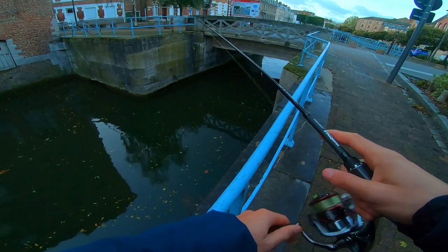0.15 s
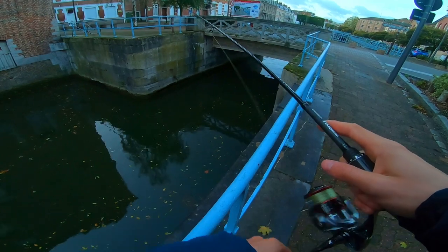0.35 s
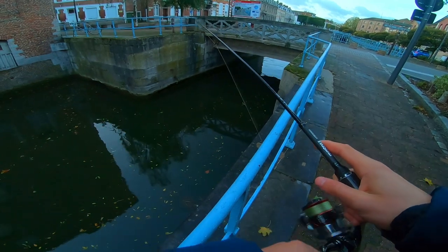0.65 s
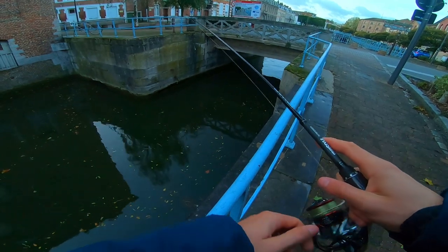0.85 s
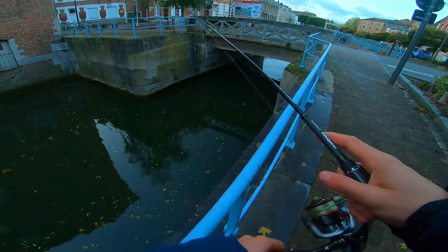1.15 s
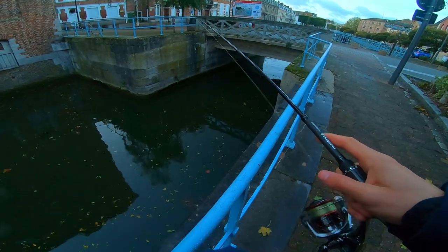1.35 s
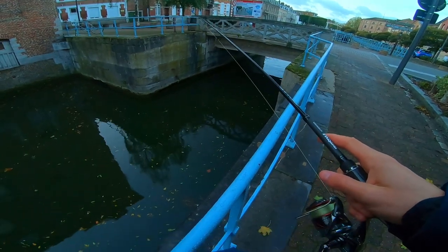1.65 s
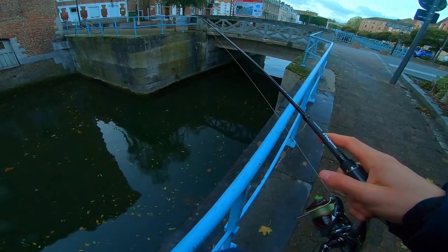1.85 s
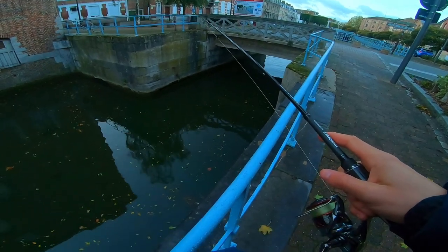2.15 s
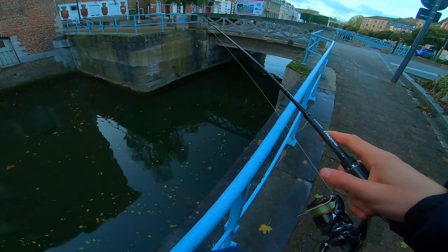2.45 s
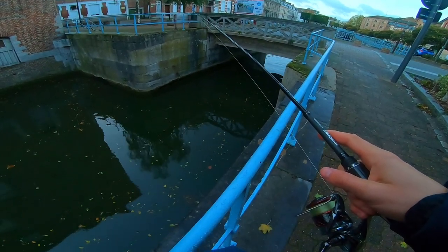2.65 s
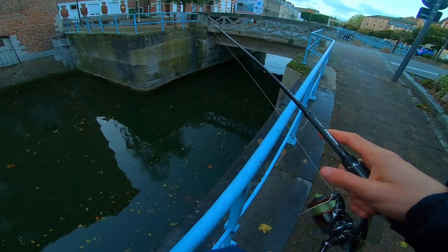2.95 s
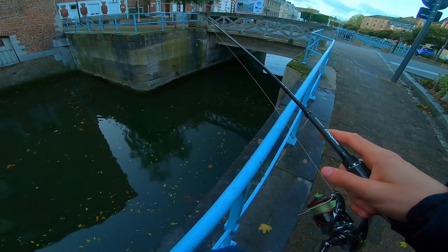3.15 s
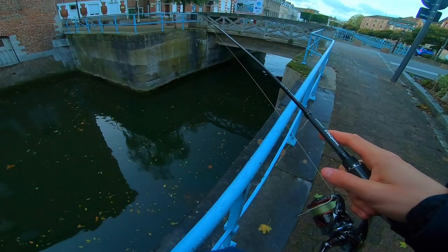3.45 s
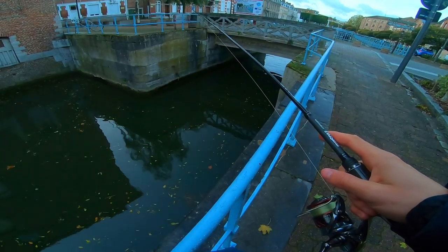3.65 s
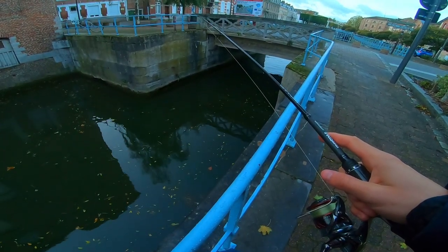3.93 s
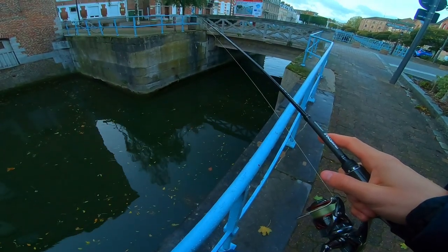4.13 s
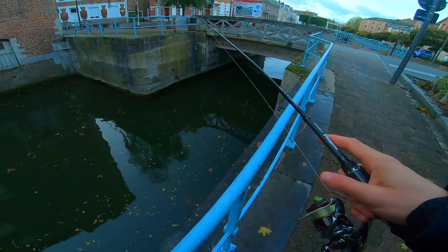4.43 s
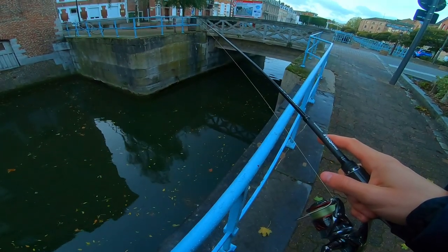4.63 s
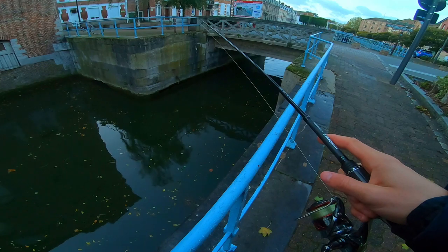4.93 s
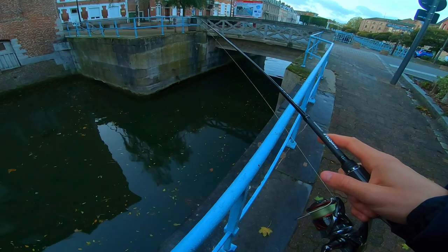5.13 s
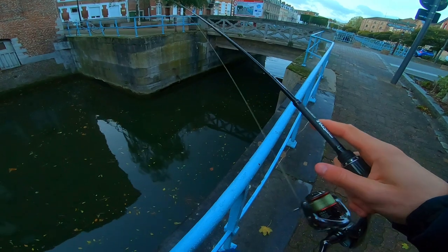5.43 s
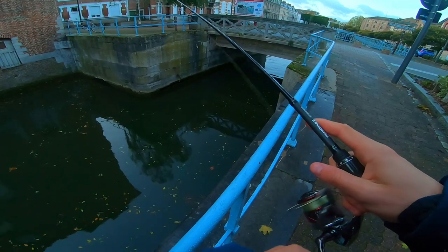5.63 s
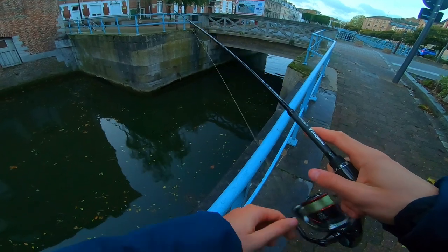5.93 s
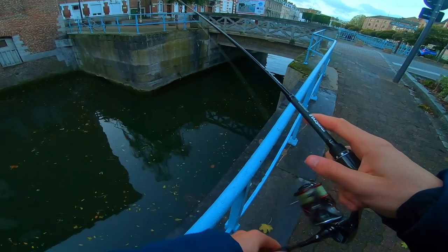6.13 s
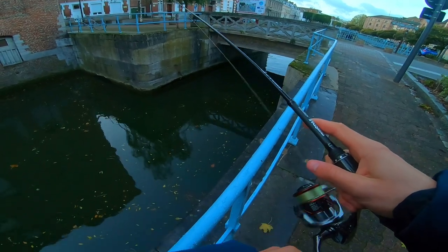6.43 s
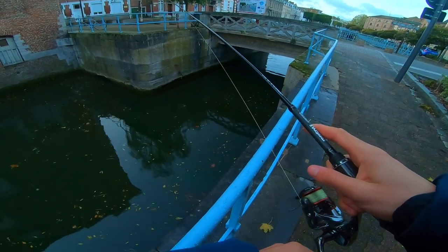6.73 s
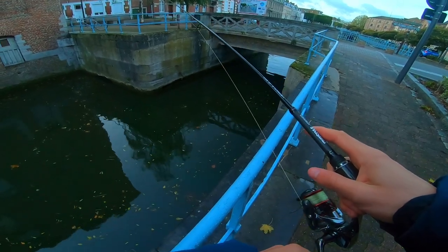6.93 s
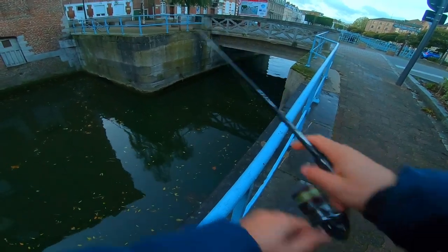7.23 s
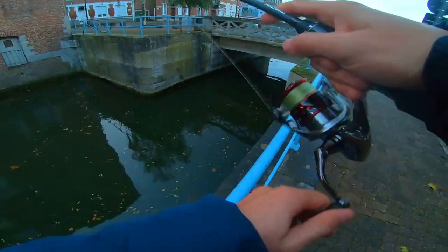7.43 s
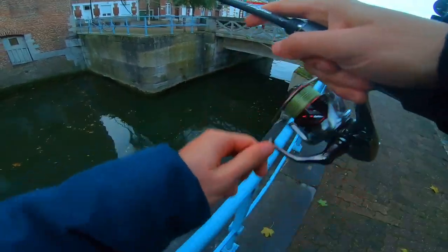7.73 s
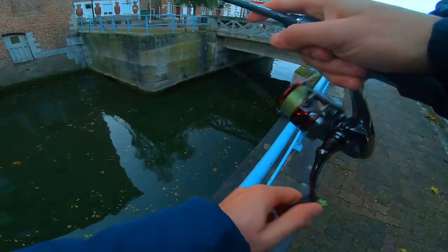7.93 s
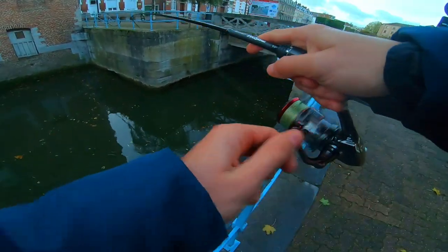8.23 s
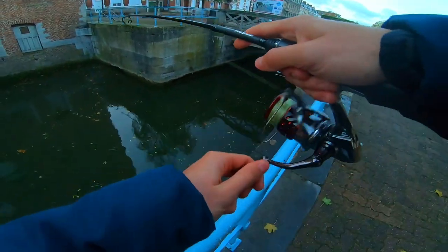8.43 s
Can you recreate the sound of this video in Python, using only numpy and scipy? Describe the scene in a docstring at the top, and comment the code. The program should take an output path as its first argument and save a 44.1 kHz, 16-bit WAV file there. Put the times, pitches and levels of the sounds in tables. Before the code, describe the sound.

Faint reel whir and cloth rustle over low traffic rumble and buffeting wind, then a sharp ratchet rip, clack and grinding, loaded winding.

```python
"""A fishing reel is wound with a faint whir beside a city canal; at the strike the drag ratchet rips.
Brief contacts ring the spool, and meshing gears under load drive the resonances of the reel body.
Knocks are short decaying partials, the sleeve is clumped friction grains, the squeaks are gliding noise.
Gusts thump as low-frequency noise and single pulses on two microphone ports; filtered noise is far traffic."""
import sys
import numpy as np
from scipy import signal
from scipy.fft import rfft, irfft
from scipy.io import wavfile
from scipy.ndimage import uniform_filter1d

SR = 44100
rng = np.random.default_rng(int(sys.argv[2]) if len(sys.argv) > 2 else 0)


def waveform_to_disk(signal):
    """Save audio, clipped to [-1, 1], as 16-bit WAV at the path in sys.argv[1]."""
    frames = np.transpose(np.atleast_2d(signal))
    scaled = np.clip(frames, -1, 1) * 32767
    samples = np.round(scaled).astype(np.int16)
    wavfile.write(sys.argv[1], SR, samples)


N = 378378
HZ = np.maximum(np.arange(N // 2 + 1) * SR / N, 1)   # frequency of each spectral bin


def from_db(db):
    """Decibel law: 20 dB is a tenfold amplitude."""
    return 10 ** (np.asarray(db) / 20)


def rms_one(x):
    """Normalization: the signal is scaled to an rms of 1."""
    return x / np.sqrt(np.mean(x ** 2) + 1e-20)


def in_time(rows, silent=False):
    """Linear interpolation of an envelope table; a silent one sinks to -120 outside its span."""
    s, *columns = np.transpose(rows)
    edge = -120 if silent else None
    t = np.arange(N) / SR
    return [np.interp(t, s, column, edge, edge) for column in columns]


def at_hz(points, hz):
    """Interpolation of a spectrum on a logarithmic frequency axis."""
    table_hz, values = np.array(points).T
    return np.interp(np.log(hz), np.log(table_hz), values)


def drift(rate):
    """Low-pass random process: noise through a double pole near rate (Hz) wanders with rms 1."""
    step = 40   # samples between the drawn values
    pole = np.exp(-2 * np.pi * rate * step / SR)
    noise = rng.standard_normal(N // step + 2002)
    slow = signal.lfilter([1], [1, -2 * pole, pole * pole], noise)[2000:]   # settled part
    return np.interp(np.arange(N) / step, np.arange(len(slow)), rms_one(slow))


def hold(start, end, edge_s):
    """Amplitude envelope: a squared ramp up, a plateau and a squared ramp down to the end."""
    t = np.arange(N) / SR
    return np.clip(np.minimum(t - start, end - t) / edge_s, 0, 1) ** 2


def resonance(x, hz, width):
    """Second-order resonance: a pole pair passes a band with a gain near 1 at its peak."""
    r = np.exp(-np.pi * width / SR)
    poles = [1, -2 * r * np.cos(2 * np.pi * hz / SR), r * r]
    return signal.lfilter([(1 - r * r) / 2, 0, (r * r - 1) / 2], poles, x)


def narrow(x, hz, width):
    """Cascaded resonance: a second pass steepens the skirts; rms 1."""
    return rms_one(resonance(resonance(x, hz, width), hz, width))


def ring(clicks, hz, t60):
    """Damped free vibration: each unit click starts a sine that falls 60 dB in t60 seconds."""
    r, w = from_db(-60 / (t60 * SR)), 2 * np.pi * hz / SR
    return signal.lfilter([0, np.sin(w)], [1, -2 * r * np.cos(w), r * r], clicks + 1e-18)


def gliding(hz, pole):
    """Quadrature modulation: low-pass noise is shifted up to a moving centre; rms 1."""
    turn = 2 * np.pi * np.cumsum(hz) / SR
    slow = signal.lfilter([1], [1, -2 * pole, pole * pole], rng.standard_normal((2, 2, N)))
    return rms_one(slow[0] * np.cos(turn) + slow[1] * np.sin(turn))


def evened(x, size):
    """Dynamic compression: division by the local rms partly flattens chance swells; rms 1."""
    x = rms_one(x)
    return rms_one(x / np.sqrt(uniform_filter1d(x ** 2, size) + .3))


def coloured(x, spectrum):
    """Spectral shaping: the noise takes the slope of a spectrum table; rms 1."""
    return rms_one(irfft(rfft(x) * from_db(at_hz(spectrum, HZ)), N))


def grains(per_s, spread_db):
    """Shot noise: a pair of random click trains of uneven size and sign; rms 1."""
    sizes_db = spread_db * np.minimum(rng.exponential(1, (2, N)), 4)
    sizes = from_db(sizes_db) * rng.choice([-1, 1], (2, N))
    return rms_one(sizes * (rng.random((2, N)) < per_s / SR))


def ratchet(contact_s=0.00015):
    """Impulsive excitation: each click is a brief rough contact that strikes all spool modes."""
    # Clicks that ring the spool: the ratchet teeth, then one late bail click.
    # Each row: start in seconds, relative peak in dB, upper modes over lower in dB.
    strikes = [(7.271, -35, 8), (7.2767, -37, -1), (7.371, -33, -3), (7.3773, -34, -4), (7.3818, -30, -2),
               (7.3846, -25, 5), (7.387, -21, 6), (7.391, -22, 4), (7.3928, -20, -8), (7.396, -22, -4),
               (7.3992, -26, -5), (7.403, -26, -1), (7.4055, -29, 3), (7.4085, -23, 11), (7.4127, -32, 6),
               (7.4163, -31, 4), (7.4196, -25, 6), (7.4237, -22, 7), (7.429, -26, -1), (7.435, -22.5, -8),
               (7.4439, -26, -2), (7.4509, -17.5, -7), (7.809, -29, -2)]
    # Modes of the spool. Each row: frequency in Hz, relative level in dB, t60 in seconds.
    spool_modes = [(1900, -21, 0.0067), (3220, -10, 0.0037), (4380, -13, 0.004), (5260, -3, 0.007),
                   (5800, 3, 0.008), (6370, 0, 0.005), (8250, 1, 0.005), (9050, -4, 0.005),
                   (9900, -5, 0.004), (11500, -13, 0.002), (13000, -14, .0015), (14800, -18, .0015)]
    s, peak_db, upper_db = np.transpose(strikes)
    steps, out = np.arange(60), np.zeros((2, N))
    at = np.round(s * SR).astype(int)[:, None] + steps
    fade = np.exp(-steps / (contact_s * SR))
    for hz, level_db, t60 in spool_modes:
        contact = rng.standard_normal((len(s), 2, len(steps))) * fade
        # how hard each contact drives this mode
        drive = np.abs(contact @ np.exp(2j * np.pi * hz * steps / SR))
        share_db = np.minimum(upper_db, 0) if hz > 7200 else np.minimum(-upper_db, 0)
        height = from_db(peak_db + level_db + share_db)[:, None] / (drive + 0.18)
        clicks = np.zeros((2, N))
        clicks[:, at] = (contact * height[..., None]).swapaxes(0, 1)
        out += resonance(ring(clicks, hz, t60), hz, hz / 3)
    return out * from_db([[1], [-5]])   # a near source: both ports hear much the same


def gears(damping_hz=9500, catch_db=2.5):
    """Forced vibration: teeth mesh unevenly, catch in clumps and drive the modes of the reel body."""
    # Effort on the handle under load. Each row: time in seconds, then the drive in dB of the modes
    # up to 2500 Hz, of those up to 5000 Hz and of those above.
    effort = [(7.52, -76, -72, -74), (7.6, -69, -59, -64), (7.655, -58, -55, -56), (7.73, -63, -54, -54.5),
              (7.79, -49, -56, -53.5), (7.83, -59, -61, -63), (7.87, -55, -62, -63), (7.925, -55, -54, -56),
              (7.99, -61, -62, -64), (8.055, -55, -56, -59), (8.09, -56, -61, -63), (8.15, -59, -52.5, -58),
              (8.22, -62, -59, -58.5), (8.3, -65, -64, -59.5), (8.4, -61, -62, -59), (8.45, -54, -62, -62),
              (8.5, -52, -71, -64), (8.54, -72, -78, -71), (8.58, -81, -81, -71)]
    # Modes of the body. Each row: frequency in Hz, width of one filter pass in Hz, relative level in dB.
    body_modes = [(2050, 130, -5), (3320, 60, -8), (3620, 90, -3), (4295, 140, -8), (4720, 60, -11),
                  (5290, 300, -4), (5780, 350, -4), (6150, 400, -2), (4000, 900, -7), (2900, 2000, -6),
                  (7200, 1400, -4), (9300, 2500, -9), (12300, 3000, -22)]
    hum_db, whine_db, whirr_db = in_time(effort, silent=True)
    mesh = from_db(catch_db * drift(40)) * grains(3000, 2.9)
    mesh = irfft(rfft(mesh) / (1 + (HZ / damping_hz) ** 4 + (1200 / HZ) ** 2), N)
    loaded, out = slice(round(effort[0][0] * SR), N), 0
    for k, (hz, width, level_db) in enumerate(body_modes):
        effort_db = whirr_db if hz > 5000 else whine_db if hz > 2500 else hum_db
        mode = (-1) ** k * evened(narrow(mesh[:, loaded], hz, width), size=700)
        out = out + from_db((effort_db + level_db + 1.0 * drift(14))[loaded]) * mode
    return np.pad(out, ((0, 0), (loaded.start, 0)))


def winding(upper_hz=8400, upper_db=-9):
    """Speed-dependent pitch: the rotor whirs in a climbing band; the line roller squeaks below it."""
    # Pushes on the handle. Each row: start, fastest moment and end in seconds, relative whir level in dB,
    # nominal whir pitch in Hz when fastest.
    pushes = [(.115, .195, .48, -60, 7700), (.52, .55, .6, -67, 7100), (.77, .87, 1.06, -64, 7500),
              (1.08, 1.17, 1.31, -69, 7250), (5.54, 5.565, 5.66, -66, 8100), (5.93, 6.14, 6.3, -60, 7750)]
    # Squeaks of the line roller. Each row: start and length in seconds, relative level in dB, pitch in Hz.
    squeaks = [(0, .12, -66, 4500), (.22, .2, -67, 4350), (.72, .06, -67, 4300), (1.15, .1, -64, 4580),
               (1.27, .06, -62.5, 4480), (1.35, .09, -62.5, 4500), (1.46, .07, -67, 4400),
               (5.76, .18, -64.5, 4500), (5.99, .11, -64.5, 4380), (6.4, .1, -70, 4500)]
    # The rotor sings a thin line as it turns. Each row: start and end in seconds, relative level in dB.
    turns = [(.12, 1.33, -71), (5.57, 6.3, -70)]
    rest_hz, surge_s, sag_db_per_s, edge_s = 7050, .04, 10, .045   # pitch and level peak when fastest
    t = np.arange(N) / SR
    whir, whir_hz, roller, roller_hz = 0, rest_hz, 0, 0
    for start, fastest, end, db, top_hz in pushes:
        surge = np.exp(-((t - fastest) / surge_s) ** 2)
        sagging_db = db - sag_db_per_s * np.abs(t - fastest)
        whir = whir + from_db(sagging_db) * hold(start, end, edge_s)
        climb = .7 * surge + .5 * hold(start, end, (end - start) / 3) ** .5
        whir_hz = whir_hz + (top_hz - rest_hz) * climb
    for start, length, db, hz in squeaks:
        early = start - edge_s / 2
        roller = roller + from_db(db) * hold(early, start + length, edge_s / 2)
        roller_hz = np.where(t > early, hz, roller_hz)
    out = whir * from_db(2.2 * drift(25)) * gliding(whir_hz + 90 * drift(25), pole=.95)
    line = sum(from_db(db) * hold(start, end, edge_s) for start, end, db in turns)
    out += line * from_db(2.5 * drift(12)) * narrow(rng.standard_normal((2, N)), rest_hz, 380)
    squeak = evened(gliding(roller_hz + 50 * drift(15), pole=.978), size=900)
    out += roller * from_db(1.5 * drift(25)) * squeak
    upper_band = narrow(rng.standard_normal((2, N)), upper_hz, 500)   # its pitch stays put
    return out + whir * from_db(upper_db + 3 * drift(13)) * upper_band


def knocks(crack_db=-16):
    """Modal impact: a struck part rings in a few decaying partials, over a dying crack of noise."""
    # Knocks of handle and bail, and the low crack of the last ratchet click.
    # Each row: start in seconds, relative peak in dB, pitch in Hz, t60 in seconds, left over right in dB.
    blows = [(7.283, -37, 2260, 0.01, -2), (7.4509, -19.5, 1920, 0.0064, -10),
             (7.4885, -23.5, 1560, 0.019, -8), (7.663, -39, 4070, .015, -5),
             (7.778, -24.5, 2900, 0.0037, -4), (8.158, -44, 3600, .025, -1.5), (7.929, -39, 1900, .01, -2),
             (8.069, -41, 4350, .012, -1), (8.4544, -45, 2040, 0.029, -10), (8.481, -42, 4370, .02, -1)]
    # Partials of a struck part. Each row: multiple of its pitch, relative level in dB.
    partials = [(.58, -4), (1, 0), (1.39, -9)]
    out, seconds = np.zeros((2, N)), np.arange(1500) / SR
    for s, peak_db, hz, t60, pan_db in blows:
        crack_fade = from_db(crack_db - 60 * seconds / (1.8 * t60))
        crack = narrow(rng.standard_normal(len(seconds)), hz, hz) * crack_fade
        modes = sum(from_db(db) * np.sin(2 * np.pi * multiple * hz * seconds) for multiple, db in partials)
        onset = 1 - np.exp(-seconds * hz)
        blow = modes * from_db(-60 * seconds / t60) * onset + crack
        at = round(s * SR)
        out[:, at:at + len(blow)] += from_db(peak_db + pan_db / 2 * np.array([[1], [-1]])) * blow
    return out


def chirp():
    """Frequency glide: one faint breathy note of band noise slides down."""
    # One row: start and length in seconds, level in dB, first and last pitch in Hz.
    start, length, db, from_hz, to_hz = (5.275, .05, -62, 7300, 5700)
    hz = np.interp(np.arange(N) / SR, [start, start + length], [from_hz, to_hz])
    return from_db(db) * hold(start, start + length, length / 3) * gliding(hz, pole=.96)


def sleeve(split_hz=5000):
    """Friction noise: sliding cloth is dense fine grains in clumps, with the treble set apart."""
    # Sleeve and line in motion, a list for each spell.
    # Each row: time in seconds, level in dB, treble gain over the usual colour in dB.
    spells = [
        [(0, -55, -7), (.3, -53, -11), (.55, -56, -9), (1.05, -65, -12), (1.2, -52.5, -13), (1.5, -81, -11)],
        [(5.5, -67, 2), (5.7, -52.5, -8), (5.95, -65, -4), (6.3, -68, 3), (6.6, -61, -7)],
        [(7.19, -70, 0), (7.25, -55, 2), (7.28, -41.5, -11), (7.325, -46.5, 3), (7.36, -39.5, 0),
         (7.395, -38.5, 5.5), (7.44, -41.5, 6), (7.465, -35.5, -2), (7.488, -37, -5), (7.5, -47.5, -1),
         (7.555, -49, -4), (7.6, -74, -1)],
    ]
    # Colour of the cloth. Each row: frequency in Hz, relative level in dB per Hz.
    spectrum = [(300, -17), (700, 0.5), (1200, -0.5), (2300, -5), (4500, -5.5), (6300, -9.5), (8300, -7.5),
                (10000, -17), (12000, -26.5), (15500, -35)]
    cloth = from_db(2.6 * drift(60)) * coloured(grains(14000, 3.0), spectrum)
    treble = irfft(rfft(cloth) / (1 + (split_hz / HZ) ** 4), N)
    out = 0
    for rows in spells:
        level_db, treble_db = in_time(rows, silent=True)
        out = out + from_db(level_db) * (cloth - treble + from_db(treble_db) * treble)
    return out


def wind(buffet_db=1.5, bright_db=-13, knee_db=-25, leak_db=-19):
    """Turbulent pressure: eddies press on each port, and stronger gusts reach higher in pitch."""
    # Course of the wind, with its longer gusts and lulls.
    # Each row: time in seconds, level in dB at the exposed left and the sheltered right port.
    course = [(0, -41, -46), (1.5, -35, -44), (1.9, -48, -48), (3.8, -46, -46), (5.2, -55, -58),
              (6.3, -47, -46), (6.5, -23.5, -42), (6.95, -23, -49), (7.03, -35, -46), (7.1, -25.5, -46),
              (7.27, -29.5, -43), (7.35, -29.5, -32.5), (8.16, -24.5, -33), (8.23, -33, -40),
              (8.58, -53, -47)]
    # Short gusts on the left port. Each row: middle and length in seconds, level in dB.
    gusts = [(0.1, 0.14, -34), (0.31, 0.22, -29), (0.8, 0.11, -27.5), (1.342, 0.27, -33),
             (1.517, 0.11, -37), (1.72, 0.14, -26.5), (1.986, 0.11, -30), (2.568, 0.35, -29),
             (2.8, 0.26, -26), (3.164, 0.071, -30), (3.463, 0.23, -26.5), (3.592, 0.085, -26),
             (4.09, 0.16, -40), (5.037, .12, -47), (5.49, 0.14, -34.5), (5.882, 0.15, -30),
             (6.2, 0.34, -27), (7.544, 0.34, -17.5), (7.93, .14, -31), (8.142, 0.27, -20.5),
             (8.36, .2, -29)]
    # Colour of the wind. Each row: frequency in Hz, relative level in dB per Hz.
    spectrum = [(9, -30), (16, -2), (26, 0), (40, 1), (65, -3), (95, -14), (140, -20), (200, -27),
                (300, -40), (600, -90)]
    # Single eddies bursting. Each row: middle in seconds, relative peak in dB, pitch in Hz,
    # port (0 left, 1 right).
    thumps = [(0.266, -23, 79.6, 0), (0.366, -17, 35, 0), (3.441, -22, 108, 0), (6.802, -23, 84, 0),
              (6.891, -13.5, 94, 0), (1.709, -25, 46.6, 0), (2.012, -15.5, 35.4, 0),
              (2.748, -15.5, 43.7, 0), (4.063, -21.5, 44.7, 0), (6.488, -11.5, 77, 0), (6.7, -11.5, 44, 0),
              (6.966, -19, 64.5, 0), (7.22, -21, 60.4, 0), (7.344, -15, 77, 0), (7.547, -12.5, 75, 0),
              (7.734, -14.5, 70, 0), (7.936, -13, 42.5, 0), (8.002, -12, 54.5, 1), (8.138, -16, 47, 1),
              (8.16, -9, 85, 0), (8.334, -13, 40.6, 0)]
    gust_db = np.array(in_time(course))
    swells = 0
    for s, length, db in gusts:
        swells = swells + from_db(db) * hold(s - length / 2, s + length / 2, length / 2) ** .5
    gust_db[0] = 10 * np.log10(from_db(gust_db[0]) ** 2 + swells ** 2)   # powers add
    low = coloured(rng.standard_normal((2, N)), spectrum)
    # the gust sets the level, not the eddies
    low = low / np.sqrt(uniform_filter1d(low ** 2, size=3500) + 0.019)
    flutter = narrow(narrow(rng.standard_normal((2, N)), 145, 220), 145, 220)
    lift = from_db(bright_db + .7 * (gust_db - knee_db).clip(-25, 6) + 2.5 * drift(14))
    buffet = buffet_db * np.array([drift(4.8), drift(12.0)])
    out = from_db(gust_db + buffet) * (low + lift * flutter)
    seconds = np.arange(-2000, 2000) / SR
    phases = rng.uniform(0, 2 * np.pi, len(thumps))
    for (s, peak_db, hz, port), phase in zip(thumps, phases):
        bell = np.exp(-(1.6 * hz * seconds) ** 2)   # about one cycle long
        swing = bell * np.cos(2 * np.pi * hz * seconds + phase)
        at = round(s * SR)
        out[int(port > .5), at - 2000:at + 2000] += from_db(peak_db) * swing
    return out + from_db(leak_db) * out[0] * [[0], [1]]   # the left port leaks into the right


def traffic(base_db=-35.5):
    """Superposed broadband sources: engines rumble, tyres roar and hiss, and each swells as cars pass."""
    # Colour of the traffic. Each row: frequency in Hz, relative level in dB per Hz.
    spectrum = [(20, 5), (80, 2.5), (190, -2.5), (340, -5), (480, -10.5), (700, -18), (950, -20),
                (1250, -26.5), (1550, -23), (2000, -26), (2600, -28.5), (3500, -31.5), (4300, -36.5),
                (5600, -36.5), (9300, -45.5), (10800, -60.5), (12500, -100)]
    # Passing tyres. Each row: time in seconds, gain in dB of the rumble, of the roar above about 700 Hz
    # and of the hiss above about 3500 Hz.
    passing = [(0, 2, -1, 3.5), (1.5, 2.5, 0.9, 2), (2.9, 1.5, 0.9, -1.5), (3.6, 2, 0.5, 3), (5.1, 2, 2, 1),
               (6.4, 2.5, 1, 5), (7.1, 2, -1.9, -0.5), (7.8, -0.1, 1.1, 8), (8.58, 1.5, -0.5, 3)]
    # Far engines. Each row: frequency in Hz, width of one filter pass in Hz, relative level in dB.
    drones = [(259, 28.5, -52.5), (435.5, 12.4, -59.5)]
    rumble_db, roar_db, hiss_db = in_time(passing)
    noise = rfft(from_db(base_db) * coloured(rng.standard_normal((2, N)), spectrum))
    above_rumble, hiss_share = 1 / (1 + (700 / HZ) ** 4), 1 / (1 + (3500 / HZ) ** 6)
    rumble = irfft(noise * (1 - above_rumble), N)
    roar = irfft(noise * (above_rumble - hiss_share), N)
    hiss = irfft(noise * hiss_share, N)
    out = rumble * from_db(rumble_db + 0.18 * drift(1.4))
    out += roar * from_db(roar_db + 0.65 * drift(8.4) + 0.84 * drift(1.3))
    out += hiss * from_db(hiss_db + 0.77 * drift(27))
    for hz, width, level_db in drones:
        out += from_db(level_db + 2.05 * drift(1.4)) * narrow(rng.standard_normal((2, N)), hz, width)
    return out


def at_ports(mid, side):
    """Interchannel coherence: two signals mix into left and right, alike and leaning by frequency."""
    # Likeness of the ports. Each row: frequency in Hz, left-right correlation from -1 to 1.
    likeness = [(150, 1), (280, 1), (430, 0.98), (600, 0.83), (780, 0.44), (950, 0.23), (1250, 0.037),
                (1480, 0.17), (1800, 0.7), (2400, 0.61), (4100, 0.78), (5500, 0.34), (7200, -0.049),
                (8300, 0.0042), (10000, -0.13)]
    # Balance of the ports. Each row: frequency in Hz, left over right in dB.
    balance = [(60, 0), (250, 0), (430, -1), (600, -3), (950, 0), (1300, -2), (1900, -3), (2550, -5),
               (3600, -1), (4650, .5), (6200, -1), (7200, 0), (8300, -3.5), (9800, 2)]
    alike, lean_db = np.clip(at_hz(likeness, HZ), -1, 1), at_hz(balance, HZ) / 2
    mid = rfft(mid) * np.sqrt((1 + alike) / 2)
    side = rfft(side) * np.sqrt((1 - alike) / 2)
    return irfft([(mid + side) * from_db(lean_db), (mid - side) * from_db(-lean_db)], N)


def scene():
    """Superposition: airborne sound passes the ports; wind and knocks act on each directly."""
    airborne = ratchet() + gears() + winding() + chirp() + sleeve() + traffic()
    return at_ports(*airborne) + knocks() + wind()


def record(dry, stop_hz=16200):
    """Band limitation: a steep low-pass holds all above stop_hz at least 70 dB down."""
    return signal.sosfilt(signal.cheby2(12, 70, stop_hz, fs=SR, output="sos"), dry)


dry = scene()
out = record(dry)
waveform_to_disk(out)
```